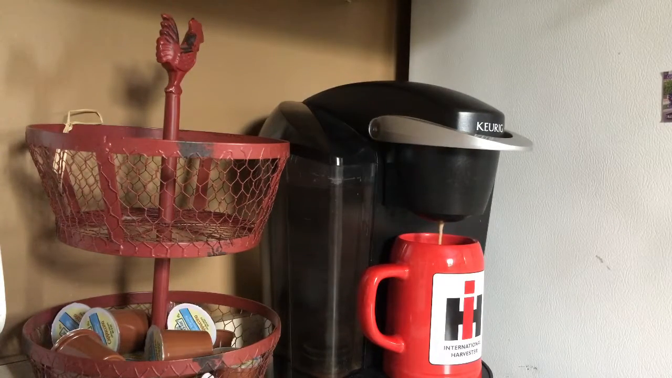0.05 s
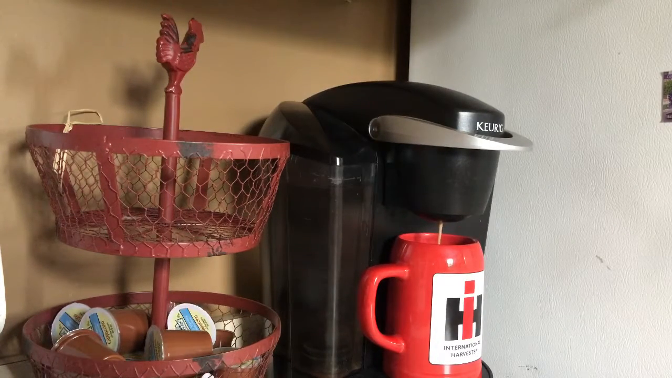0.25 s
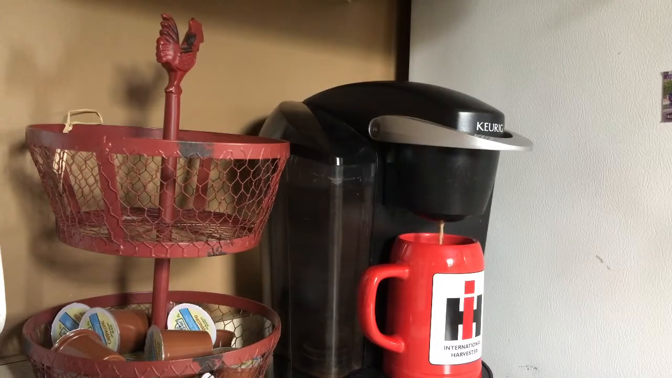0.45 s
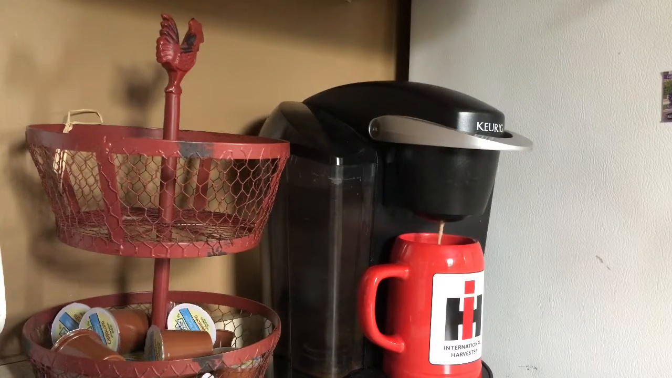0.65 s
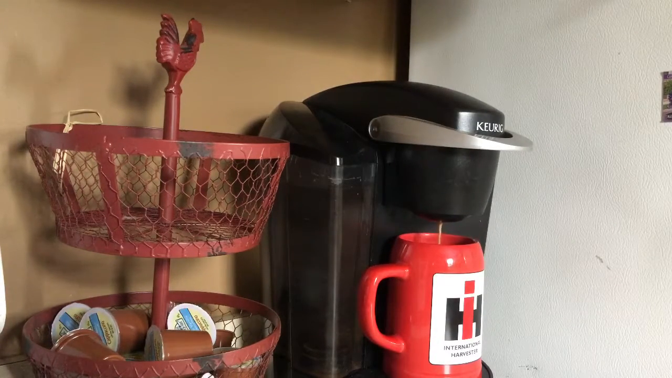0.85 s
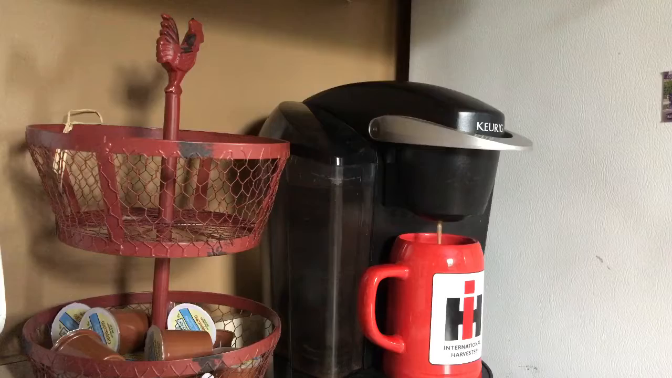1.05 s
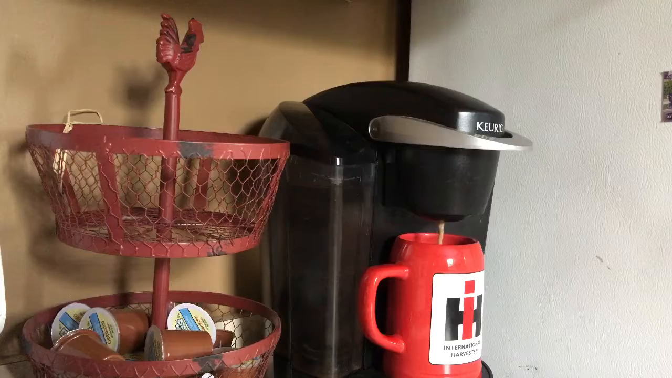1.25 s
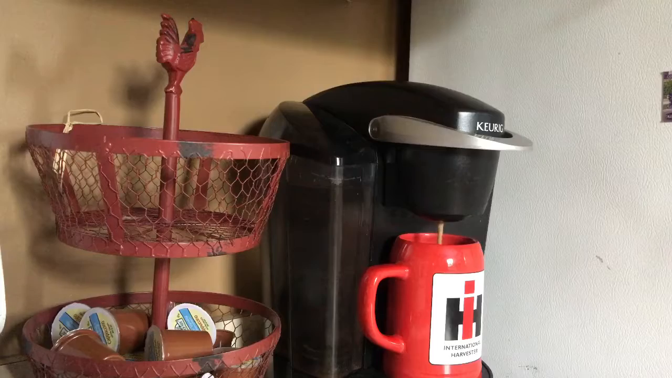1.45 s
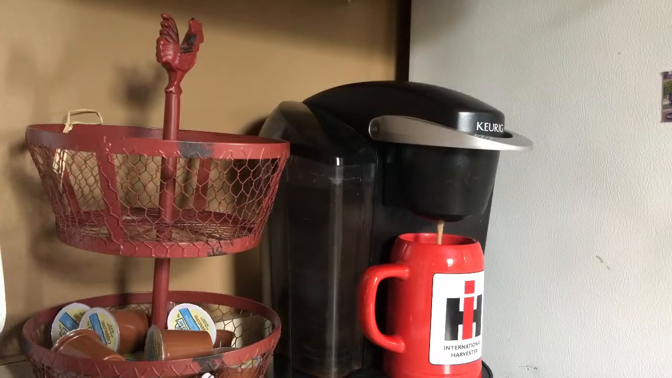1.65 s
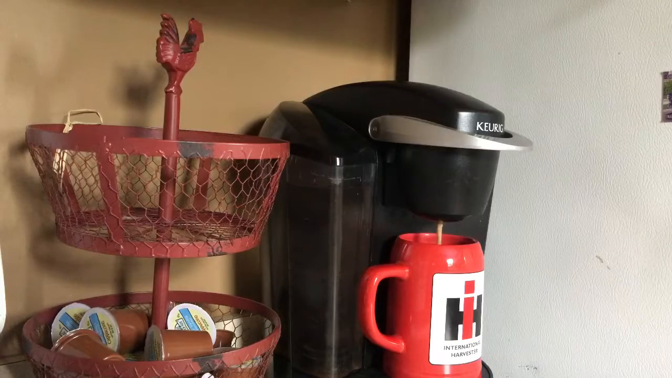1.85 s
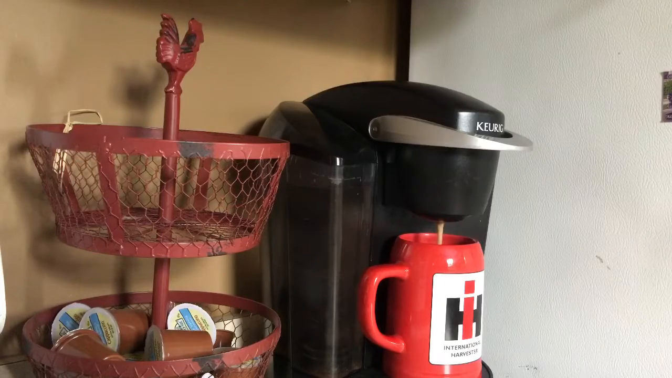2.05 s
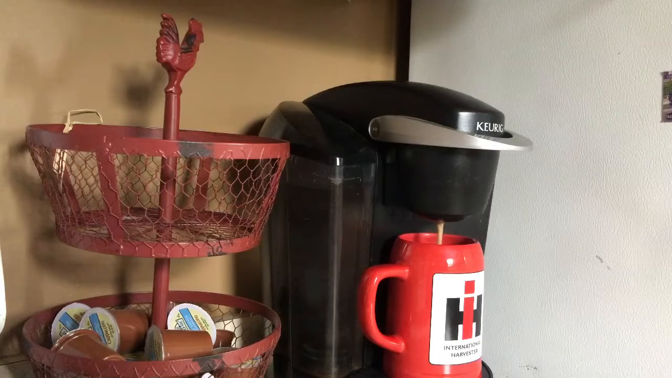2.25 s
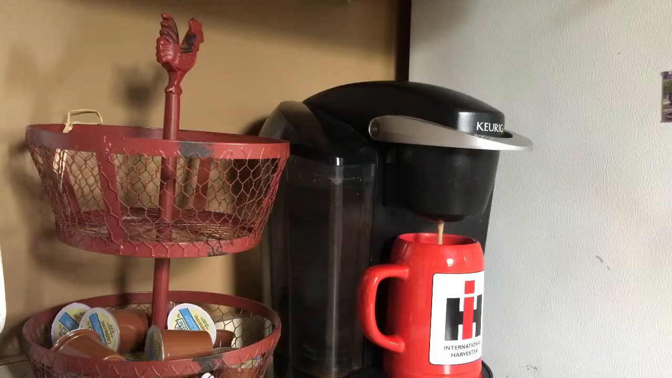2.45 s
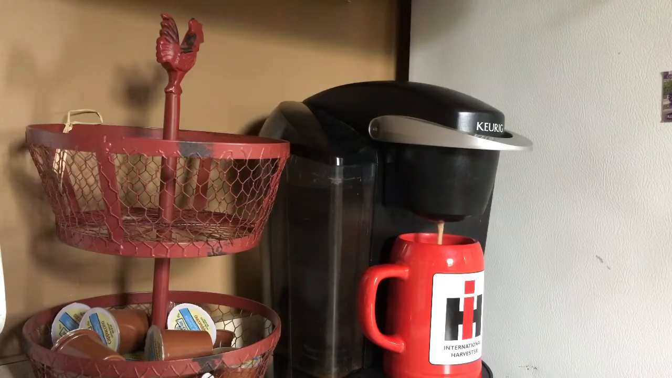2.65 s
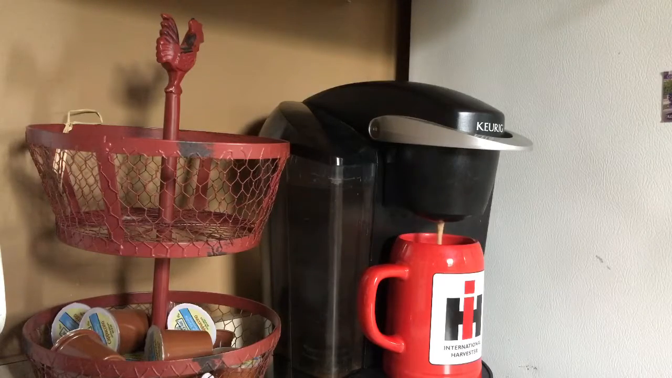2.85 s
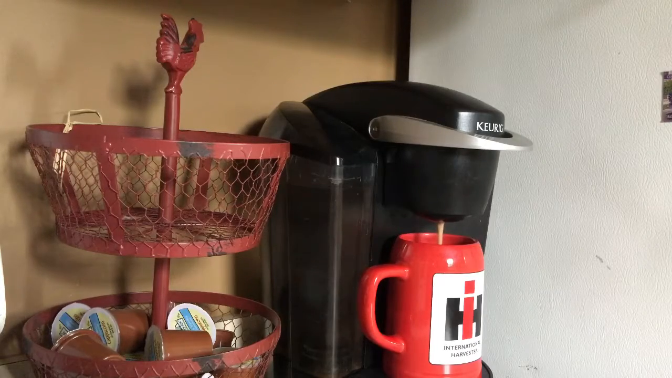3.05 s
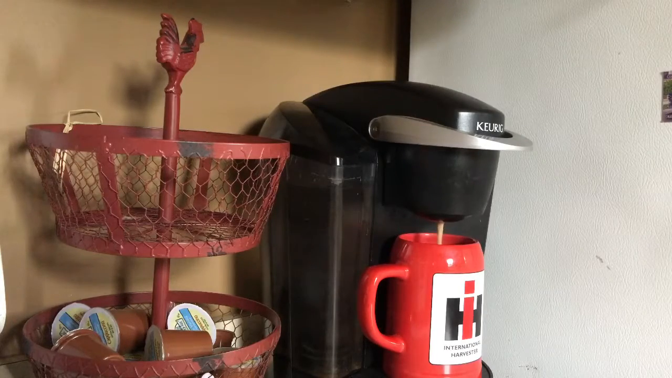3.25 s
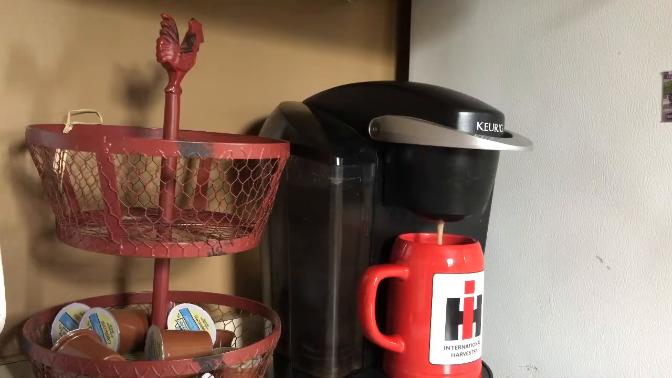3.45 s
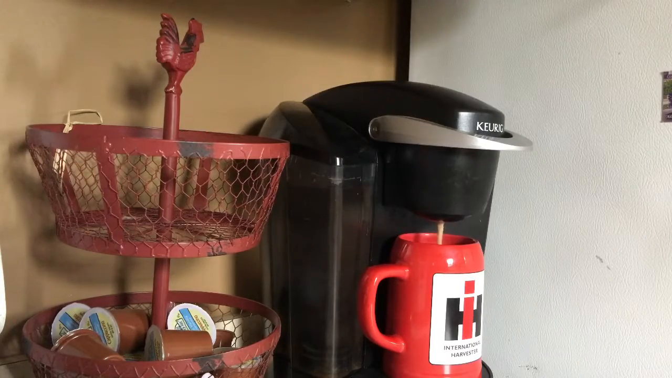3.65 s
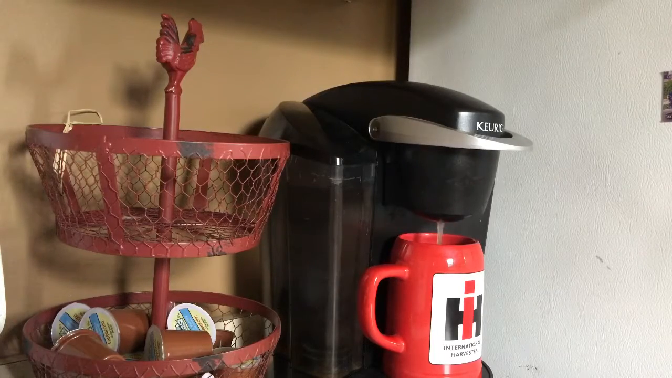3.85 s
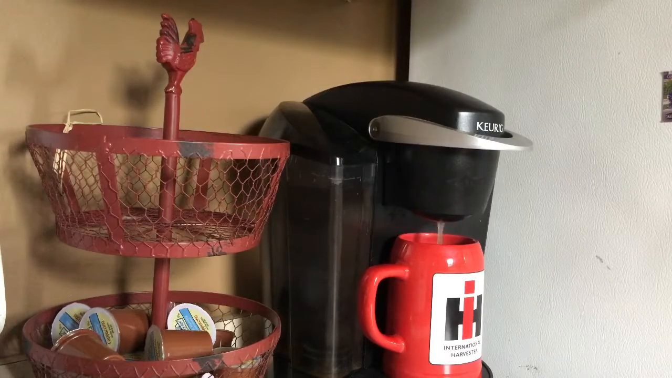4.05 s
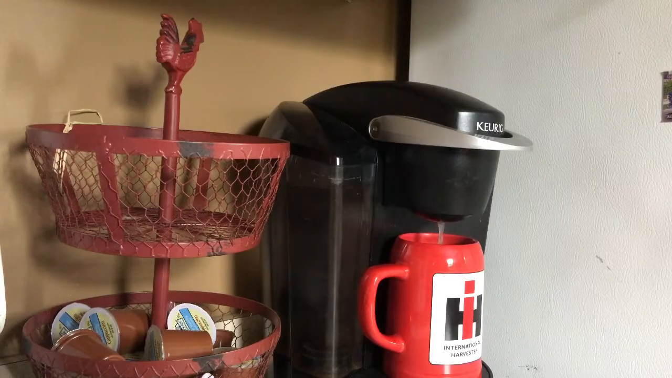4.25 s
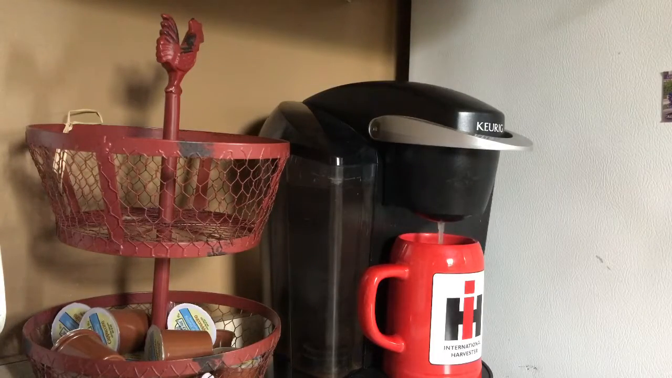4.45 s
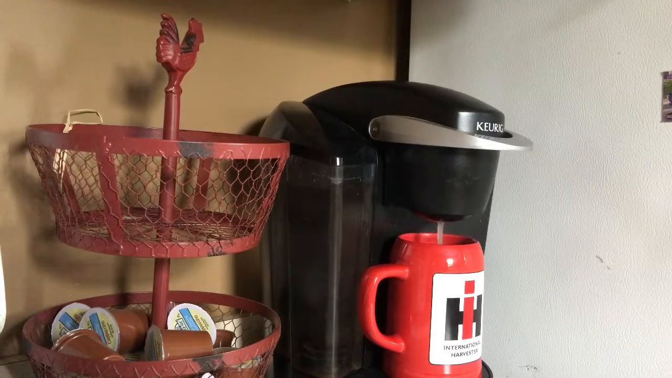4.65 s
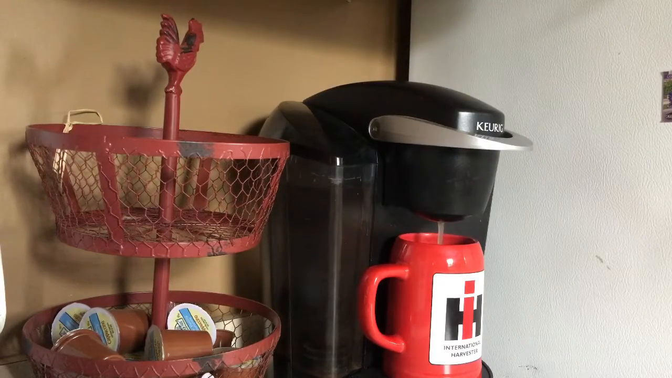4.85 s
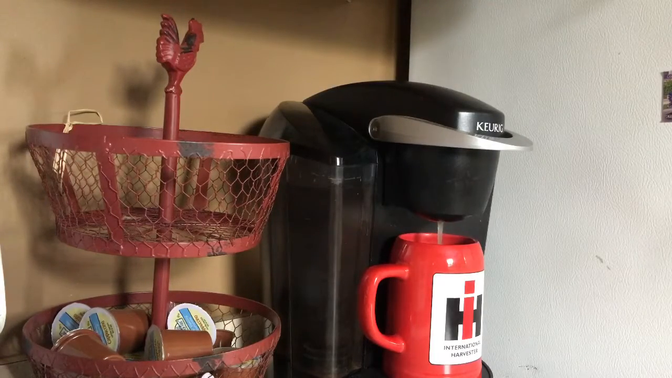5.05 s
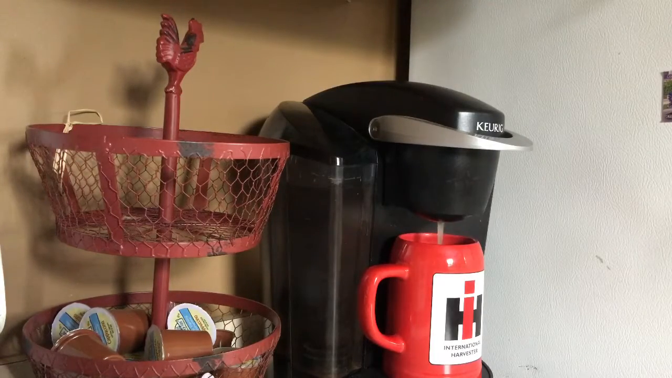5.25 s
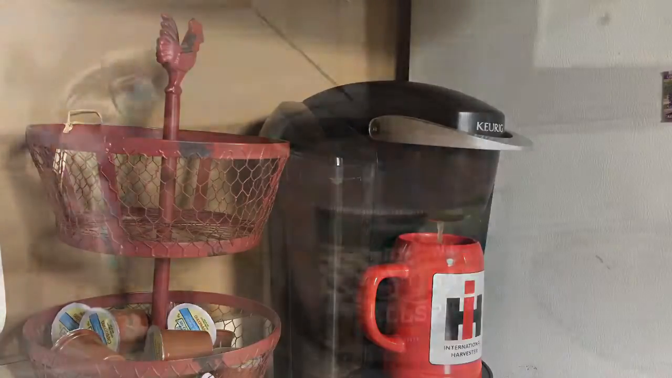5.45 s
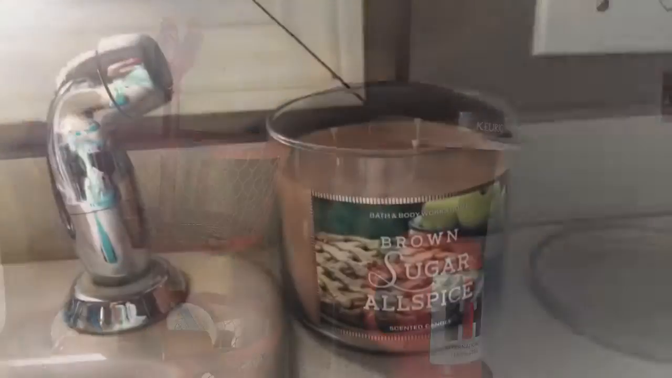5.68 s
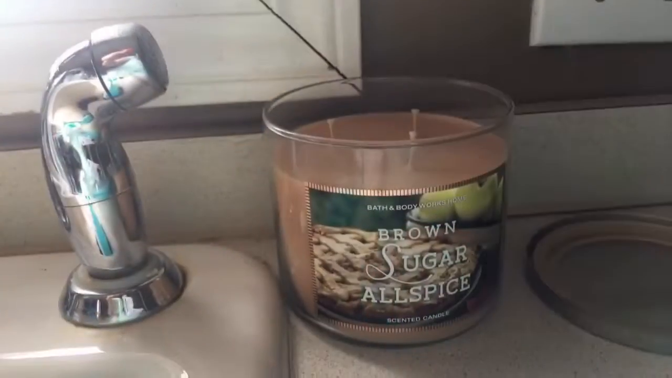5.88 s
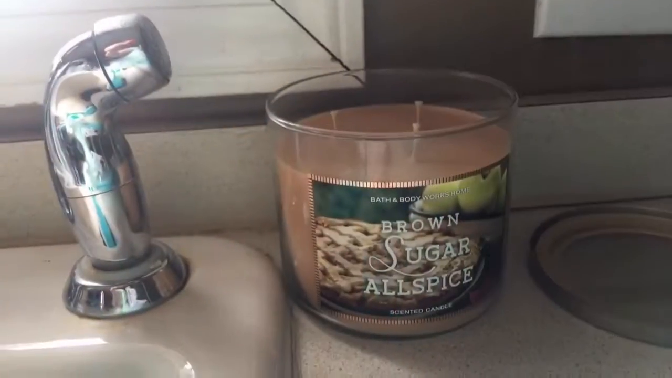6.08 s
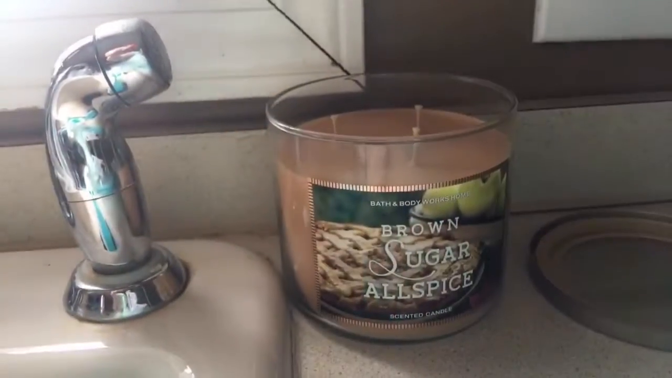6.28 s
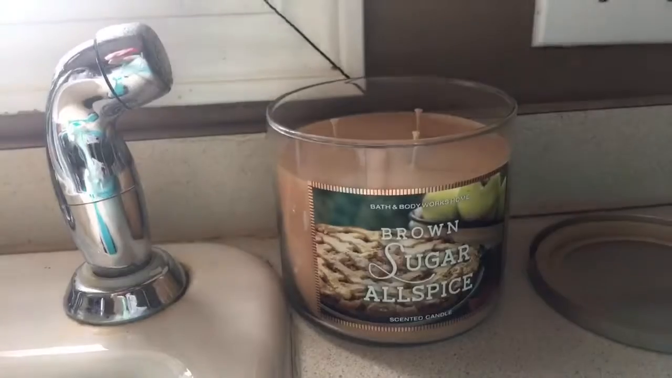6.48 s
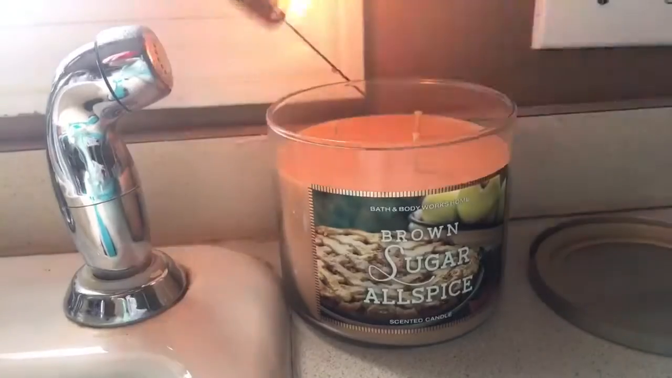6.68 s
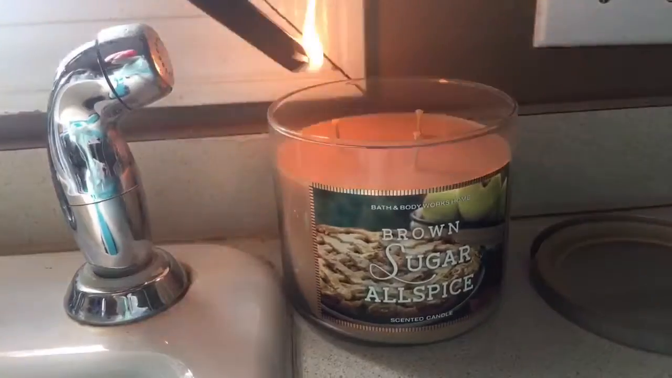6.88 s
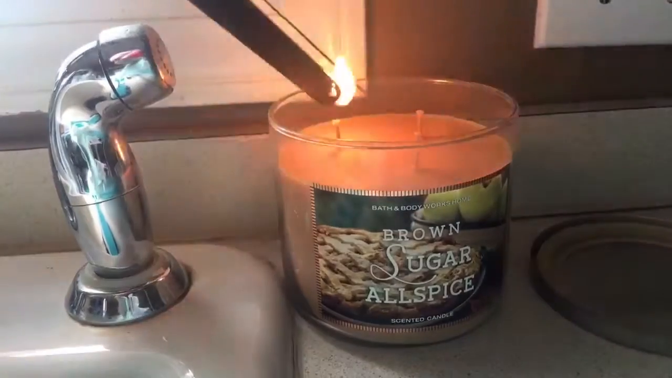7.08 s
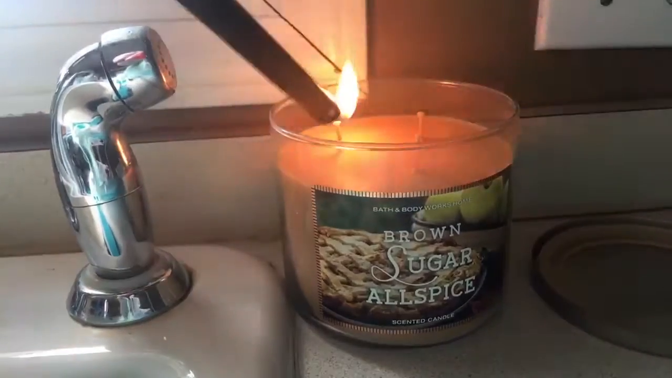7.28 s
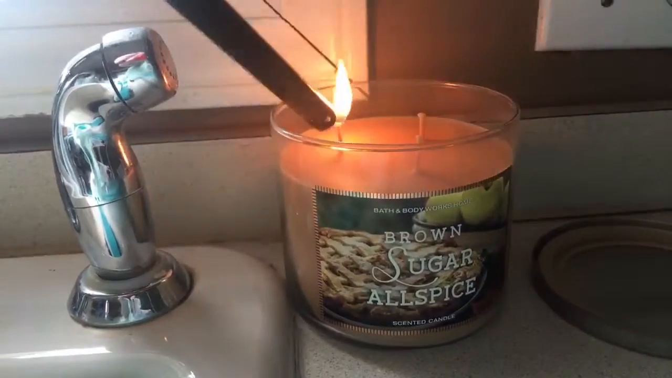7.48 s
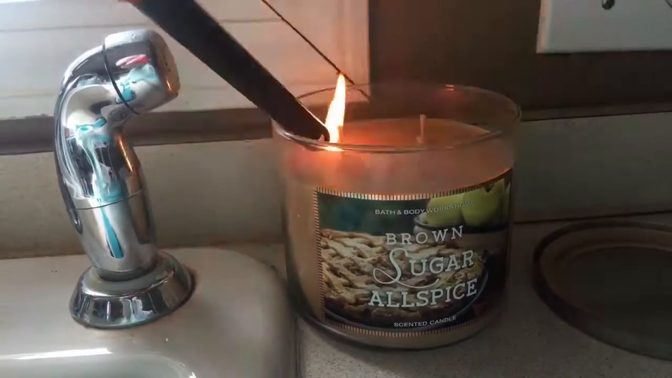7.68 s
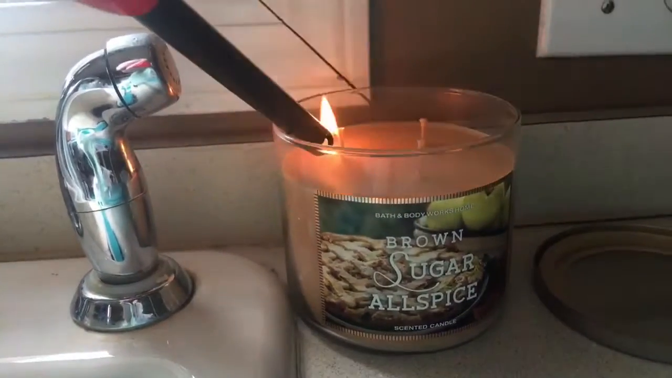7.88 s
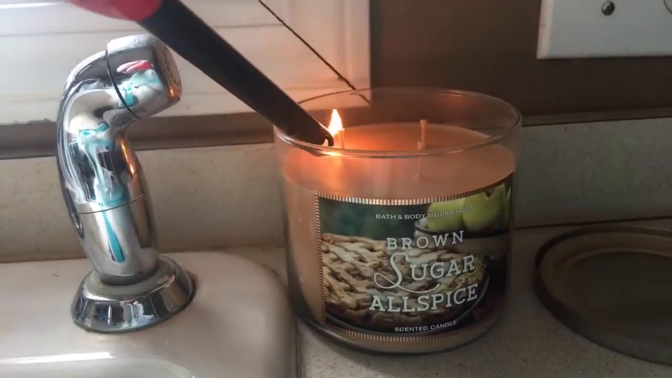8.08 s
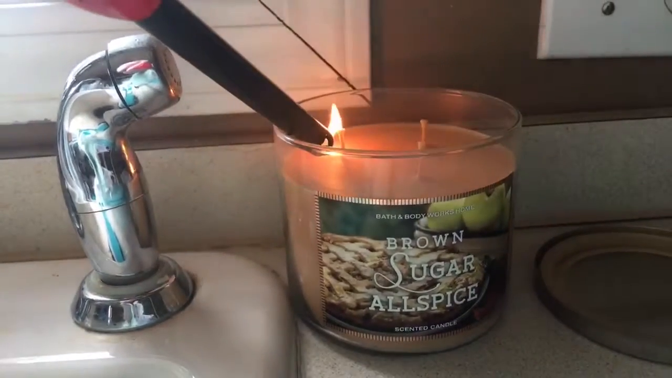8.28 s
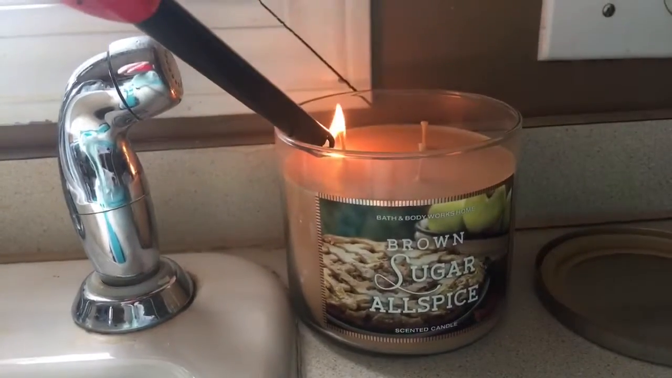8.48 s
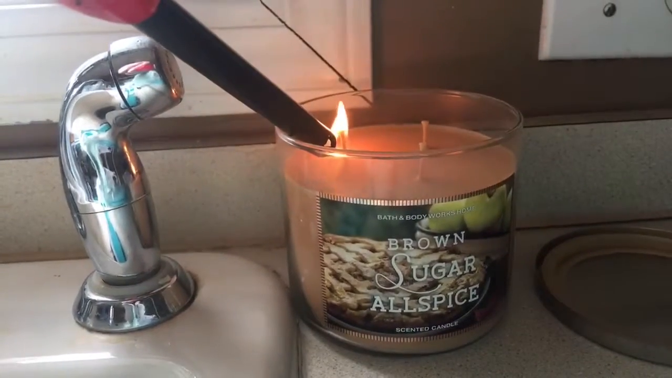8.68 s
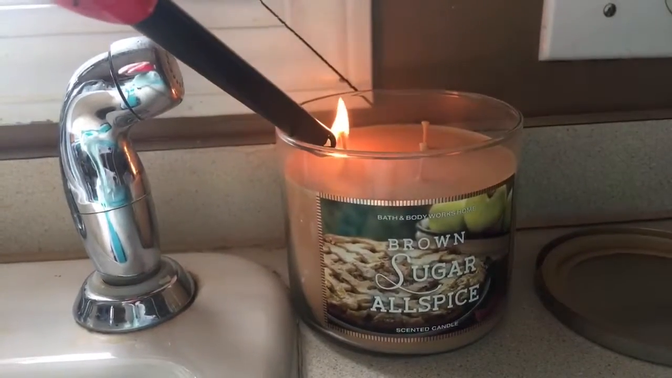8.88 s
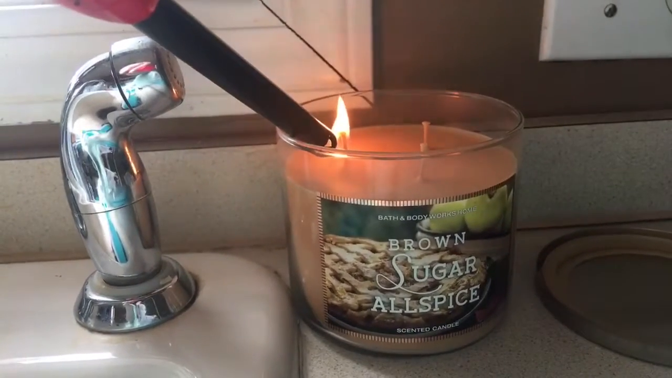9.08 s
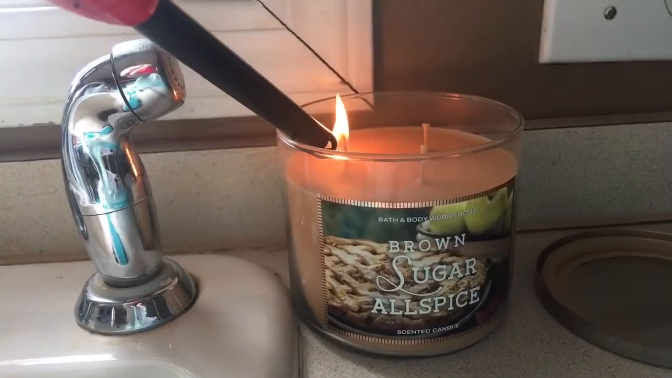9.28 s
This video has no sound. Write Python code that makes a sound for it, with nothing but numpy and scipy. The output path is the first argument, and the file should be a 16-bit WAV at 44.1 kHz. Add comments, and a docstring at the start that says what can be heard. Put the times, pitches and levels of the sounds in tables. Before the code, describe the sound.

A close mono pickup in a small hard kitchen, mostly direct with a short, quiet echo. From 0 to about 5.4 s, coffee trickles softly into a mug: quick irregular drips, hollow bubbles, fine bright spray and a low, buzzing pump hum. Dripping is densest in the first two seconds, then thins; around 3.3 s the hum rises slightly, and from 3.4 to 4.5 s rounder, foamy glugs stand out. Between 5.4 and 5.85 s this fades over to low rumble and mains hum. From 6.27 s light plastic ticks and a tiny creak build as a lighter trigger is pulled, then at 6.66 s a sharp, very loud ringing snap lands with a low puff and bump of air. Faint gas hiss lasts until 7.07 s. At 7.72 s the trigger releases with a hard metallic clack and small after-click, leaving only quiet rumbling room hum to the end.

```python
"""A small hard kitchen, in mono, mostly direct sound with the room's echo well underneath.
A pod coffee machine trickles its last coffee into a mug: random impacts excite the mug's resonances,
drops and spray spatter, bubbles ring in the mug's air column, and pump harmonics and a noise hum lie beneath.
It fades over to a counter with low rumble and mains hum, shaped from noise. There a long gas lighter creaks
with tiny slips, snaps alight with ringing clicks and a low puff, hisses with filtered noise and clicks back."""
import sys
import numpy as np
from scipy import signal
from scipy.fft import rfft, irfft
from scipy.io import wavfile

SR = 44100
rng = np.random.default_rng(int(sys.argv[2]) if len(sys.argv) > 2 else 0)


def store_pcm(level_fs):
    """Save levels as 16-bit WAV."""
    pcm = np.round(np.clip(level_fs, -1, 1) * 32767).astype(np.int16)
    wavfile.write(sys.argv[1], SR, np.atleast_2d(pcm).T)


N = 411012
T = np.arange(N) / SR   # time axis in s

# Columns named relative_db shape a spectrum only; the loudness is set where the sound is mixed.
# large bubbles in the mug: start_s, level_db, pitch_hz
GLUGS = [(0.006, -33, 867), (0.105, -44, 891), (0.214, -44, 872), (0.316, -40.5, 870), (0.337, -42.5, 866),
         (0.369, -37.5, 853), (0.616, -37, 862), (0.635, -40.5, 869), (0.751, -47, 869), (0.802, -40, 874),
         (0.82, -40, 864), (0.892, -43.5, 870), (0.998, -43.5, 875), (1.223, -45, 865), (1.243, -39, 860),
         (1.262, -33, 1010), (1.304, -39.5, 858), (1.547, -43, 869), (1.708, -41.5, 874),
         (1.748, -40.5, 864), (2.103, -44.5, 863), (2.213, -34.5, 851), (2.483, -42, 870), (2.51, -44, 860),
         (2.645, -45, 863), (2.988, -41, 900), (3.303, -38.5, 913), (3.389, -39.5, 918), (3.41, -28, 880),
         (3.522, -41, 870), (3.554, -29.5, 874), (3.782, -39.5, 883), (3.973, -40, 1010), (4.022, -38, 993),
         (4.067, -36, 1038), (4.15, -41.5, 1010), (4.189, -36.5, 894), (4.206, -32, 875), (4.233, -38, 985),
         (4.271, -36.5, 1020), (4.321, -29, 918), (4.427, -45, 1010), (4.464, -39.5, 1102),
         (4.487, -31.5, 1010), (4.656, -40.5, 1010), (4.826, -36.5, 923), (4.891, -39, 1010),
         (4.941, -39.5, 855), (5.215, -44, 861), (5.234, -43, 945), (5.384, -48, 886), (5.583, -40.5, 869)]
# drops on the coffee: start_s, level_db (before the bubble and tick offsets), pitch_hz
DROPS = [(0.014, -35.5, 2440), (0.056, -38, 1340), (0.082, -38, 1850), (0.1042, -39, 1380),
         (0.1192, -32, 1330), (0.2134, -34, 1430), (0.2656, -33.5, 3360), (0.3082, -34, 1720),
         (0.3676, -27.5, 1390), (0.391, -32, 2730), (0.4253, -36, 1430), (0.4794, -42, 1430),
         (0.5092, -34.5, 3450), (0.5576, -41, 3130), (0.5771, -39, 1470), (0.5951, -33.5, 1710),
         (0.6145, -36.5, 1250), (0.6365, -43, 1430), (0.6758, -32, 1430), (0.7208, -44, 3460),
         (0.8014, -38, 1410), (0.83, -37, 3180), (0.8929, -42, 1670), (0.905, -36, 1430),
         (0.9662, -47, 3400), (0.9937, -43, 1380), (1.0779, -38, 3980), (1.0932, -30, 2720),
         (1.1473, -34.5, 2730), (1.222, -34.5, 1310), (1.257, -38, 1440), (1.2786, -27.5, 3460),
         (1.3319, -35.5, 3530), (1.4092, -36.5, 3070), (1.4505, -41, 1430), (1.517, -32, 2300),
         (1.569, -36, 1430), (1.5996, -27.5, 2950), (1.6189, -26.5, 2950), (1.707, -28.5, 2740),
         (1.8033, -42, 2390), (1.8248, -46, 1410), (1.8392, -46, 2940), (1.939, -42, 1320),
         (1.9515, -41, 3090), (1.9883, -39.5, 3100), (2.011, -39.5, 1430), (2.0383, -45, 3110),
         (2.0862, -44, 2710), (2.1006, -38, 1330), (2.143, -41, 2750), (2.1548, -30.5, 1720),
         (2.219, -36.5, 3050), (2.3082, -39.5, 2760), (2.3585, -50, 2320), (2.373, -36.5, 2920),
         (2.4025, -41.5, 3100), (2.4818, -43, 1310), (2.5037, -34, 3170), (2.5145, -34, 3490),
         (2.6823, -47, 2760), (2.8315, -36, 4650), (2.9153, -34.5, 1430), (2.949, -36, 3500),
         (2.9866, -47, 1420), (2.9984, -40, 1290), (3.0242, -38, 1390), (3.0693, -38.5, 4000),
         (3.3278, -44, 2750), (3.3732, -41.5, 2700), (3.3942, -35, 2680), (3.478, -48, 2680),
         (3.5199, -40.5, 2740), (3.6062, -44, 3060), (3.7239, -40.5, 3400), (3.781, -31, 2440),
         (3.8302, -53, 3100), (3.949, -42, 2480), (3.9731, -35, 2880), (4.0203, -49, 1700),
         (4.0337, -46, 2450), (4.06, -38.5, 2380), (4.117, -48, 3080), (4.1492, -35.5, 3450),
         (4.1759, -42, 3380), (4.2705, -45, 2390), (4.4478, -47, 3210), (4.4852, -47, 1280),
         (4.565, -48, 3340), (4.8249, -42.5, 2750), (4.8903, -41, 2760), (4.94, -40, 3100),
         (5.1966, -47, 3640), (5.216, -42, 2710), (5.4033, -38, 2920), (5.667, -47, 2950)]
# bursts of fine spray: start_s, level_db (before the patch and fizz offsets), centre_hz
SPRAY = [(0.027, -39.5, 9500), (0.1052, -40, 5030), (0.156, -45, 10100), (0.1895, -46, 13700),
         (0.2039, -39, 11000), (0.2663, -42, 13700), (0.3306, -36, 13700), (0.3676, -43, 8940),
         (0.4249, -42, 6220), (0.4648, -42, 6770), (0.4713, -36.5, 9190), (0.5766, -44, 13700),
         (0.6604, -50, 10900), (0.6744, -37, 10000), (0.6978, -41, 6450), (0.8574, -38, 13800),
         (0.8919, -44, 11200), (0.9577, -48, 13900), (0.9916, -47, 5750), (1.0787, -43, 7800),
         (1.1887, -40, 8750), (1.2121, -32.5, 6450), (1.271, -35.5, 6070), (1.5125, -40.5, 5400),
         (1.5778, -38, 6990), (1.6202, -50, 6000), (1.6387, -28, 9500), (1.703, -45, 5040),
         (1.7345, -40, 7120), (1.8711, -41, 6040), (1.9165, -40, 10200), (2.0383, -43, 10200),
         (2.0852, -48, 10100), (2.0965, -36, 11000), (2.142, -49, 7060), (2.1555, -38, 13700),
         (2.2827, -48, 7080), (2.3501, -47, 9890), (2.373, -42, 7090), (2.6219, -48, 5540),
         (2.7147, -45, 6970), (2.8315, -37.5, 4970), (2.999, -41, 4970), (3.03, -39.5, 5590),
         (3.1188, -49, 7090), (3.1635, -40, 6910), (3.4511, -52, 10100), (3.6795, -49, 6260),
         (3.7824, -43, 10200), (3.908, -40, 9200), (3.9789, -36.5, 12600), (4.0153, -37, 12200),
         (4.0871, -46, 10900), (4.125, -48, 7110), (4.1759, -43, 10700), (4.1886, -41, 5050),
         (4.2158, -43, 9450), (4.288, -36.5, 10700), (4.8903, -43, 11100), (4.9397, -51, 9200),
         (4.997, -48, 5030), (5.3832, -48, 13700), (5.5144, -47, 9230), (5.7374, -44, 11100)]
# the stream under the single drops: start_s, gurgle_db, spatter_db, fizz_db
STREAM_LEVELS = [(0.0, -51.5, -57, -69.5), (0.41, -66, -58.5, -66.5), (0.7, -55.5, -57.5, -70.5),
                 (1.17, -62, -59, -60.5), (1.45, -57, -57, -63.5), (1.86, -60.5, -57, -65),
                 (2.46, -62, -58.5, -69.5), (3.0, -61, -58.5, -62.5), (3.26, -60, -61, -67),
                 (3.44, -63, -61, -65.5), (3.83, -58, -62, -66), (4.14, -52.5, -59, -66),
                 (4.46, -58, -62.5, -62.5), (4.72, -54.5, -61, -63), (5.12, -61.5, -61, -61),
                 (5.46, -58.5, -64, -66.5), (5.7, -67, -73, -75), (5.85, -64, -75, -79)]
# the stream turns to foam: start_s, froth_gain (loose bubbles added to the gurgle)
FOAM = [(0, 0.086), (3.1, 0.22), (3.9, 0.54), (5.8, 0.77)]
# resonances of mug and drip bay: pitch_hz, width_hz, level_db
MUG_MODES = [(1430, 45, 5), (1710, 32, 3), (2440, 920, -2), (2715, 22, 7), (2920, 110, 2.5),
             (3450, 200, 1.5), (4074, 51, -1), (6040, 93, -10), (7840, 63, -22), (9140, 73, -5),
             (10200, 270, -12)]
# resonances of the air in the mug: pitch_hz, width_hz, level_db
AIR_COLUMN = [(869.4, 26, 12), (1010, 51, 5), (1134, 100, -0.5)]
# spectrum of the fine fizz: frequency_hz, relative_db
FIZZ_SPECTRUM = [(2350, -26), (4000, -10.5), (5310, -1), (6860, -2), (7440, -12), (10300, -1), (11700, -15),
                 (14200, -5.5), (16000, -7.5)]
# spectrum of the machine's noise hum: frequency_hz, relative_db
HUM_SPECTRUM = [(8.8, -36), (15, -27.5), (160, 3.5), (225, -8), (339, -4.5), (402, -9.5), (469, -7.5),
                (639, -15), (840, -5), (900, -17.5), (1170, -26.5), (1980, -120)]
# harmonics of the pump: multiple, level_db (relative to PUMP_DB)
PUMP_HARMONICS = [(1, -36), (2, -4), (3, -4), (4, -8.5), (5, 2), (6, -1.5), (7, -14), (8, -1), (9, -16),
                  (10, 2), (11, -4.5), (12, -11.5), (13, -7), (14, 1.5), (15, -20), (16, -2.5), (17, -3),
                  (18, -31), (19, -21), (20, -20), (21, -19), (22, -5), (23, -13), (24, -6)]

# further small events at random: mean_db, spread_db, lowest_hz, highest_hz, loss over the trickle in dB
RANDOM_GLUGS = (-52, 3, 840, 1037, 0)
RANDOM_DROPS = (-48, 4, 1300, 3498, 4)
RANDOM_SPRAY = (-49, 2.5, 5000, 12000, 0.5)
GLUG_T60_S, PARTNER_SHARE = .06, 0.59   # ring time; strength of the neighbouring mode
THUD_HZ, THUD_T60_S, THUD_DB = 169.5, 0.079, -12   # a large bubble also shakes the drip tray
PUMP_HZ, PUMP_DB = 33.68, -68
HUM_DB, HUM_RISE_S, HUM_RISE_DB = -60, 3.3, 2.5   # the machine's hum grows as the brew ends
HUM_WAVER_DB = 1.5
DIP_S, DIP_WIDTH_S, DIP_DB = 3.812, .011, -22   # the level dips briefly

# parts of the trigger's clicks; the loud snap near 6.66 s takes several rows:
# start_s, level_db (reference for the row), rattle_t60_s, rattle_centre_hz,
# treble_db, barrel_ring_db, knock_db (the last three relative to level_db)
TRIGGER = [(6.265, -41, 0.018, 2480, -20, -12, -30), (6.377, -45.5, 0.064, 2976, -20, -12, -30.5),
           (6.417, -46, 0.1, 2977, -23.5, -11, -25), (6.4305, -38, 0.042, 3840, -23, -11, -30.5),
           (6.47, -37, 0.038, 3850, -25, -10, -28), (6.4903, -38, .015, 3005, -25, -14.5, -32),
           (6.4943, -26, 0.053, 2690, -15.5, -1, -30), (6.537, -25, .025, 2680, -32.5, -19.5, -30.5),
           (6.5859, -21, 0.021, 2460, -29.5, -28, -33), (6.6428, -34, 0.027, 3800, -19, -14.5, -30.5),
           (6.6586, -9, 0.015, 5360, 5.5, -24.5, -41.5), (6.6593, -9, 0.044, 2690, -15, -21.5, -40),
           (6.664, -8.5, 0.028, 3610, -9.5, -24, -42), (6.6773, -18, 0.02186, 3630, -18.5, -18, -41.5),
           (6.685, -28, 0.38, 3730, -6.5, -25, -40), (6.7241, -18.5, 0.018, 2440, -26, -23, -38),
           (7.7154, -7.5, 0.019, 3000, -13.5, 4, -18), (7.717, -16, 0.033, 1980, -26, -16, -29.5),
           (7.7637, -27, 0.029, 2000, -29, -15, -11)]
# ringing modes of the barrel: pitch_hz, level_db, t60_s
BARREL_MODES = [(1771, -18, 0.055), (2274, -9, 0.029), (2770, -16, 0.063), (3150, -21.5, 0.0492),
                (4064, -8, .02), (4240, -2.5, 0.036), (4210, -17.5, 0.054), (5860, -17.5, .03),
                (7250, -21.5, 0.025), (8570, -20.5, .018), (9824, -29.5, .04), (11000, -16, 0.018)]
# rattle spectrum of the plastic shell: frequency_hz, relative_db
SHELL_SPECTRUM = [(120, -53), (200, -7.5), (590, -12.5), (1060, -30), (1330, -6), (1840, -7.5),
                  (2740, -0.5), (3540, -2.5), (4920, -29), (6000, -22), (7800, -40), (13200, -120)]
# treble spectrum of the clicks: frequency_hz, relative_db
CRACK_SPECTRUM = [(3500, -21.5), (5300, -2), (6500, -7), (9000, -2), (12000, -8.5), (15000, -11),
                  (15800, -35.5)]
# knock spectrum of the grip in the hand: frequency_hz, relative_db
KNOCK_SPECTRUM = [(150, -24), (330, -0.5), (480, -17), (800, -6.5), (1200, 4.5), (1600, -9), (3000, -38)]
# spectrum of the hissing gas: frequency_hz, relative_db
GAS_SPECTRUM = [(1500, -21), (3000, -5), (5000, 3), (9000, 0), (15000, -8), (16500, -21.5)]

KNOCK_T60_S, RATTLE_WIDTH_HZ, BLOW_T60_S = 0.045, 1500, .03
CREAK_FROM_S, CREAK_TO_S, CREAK_DB, CREAK_PER_S = 6.375, 6.6, -57, 500   # the trigger drags in its guide
PUFF_S, PUFF_DB, PUFF_HZ, PUFF_T60_S = 6.675, -25, 278, 0.12   # the gas catches fire
PUSH_S, PUSH_DB, PUSH_HZ, PUSH_T60_S = 6.675, -17.5, 43, 0.24   # and its air pushes on the microphone
GAS_LEAK_S, GAS_LEAK_DB = 6.39, -73   # the hiss starts,
GAS_OPEN_S, GAS_OPEN_DB, GAS_END_S = 6.68, -64, 7.07   # swells and stops

# spectrum of the room tone: frequency_hz, relative_db
ROOM_SPECTRUM = [(53, -40.5), (90, -8), (124, -5.5), (187, -20.5), (232, -11.5), (269, -38.5), (313, -14.5),
                 (432, -32.5), (623, -23), (772, -40), (878, -29.5), (2800, -28), (3790, -29), (5110, -40),
                 (15300, -50.5)]
# spectrum of the low rumble: frequency_hz, relative_db
RUMBLE_SPECTRUM = [(8.8, -35), (15, -6.5), (43, 0), (59, 2.5), (92, -22.5), (110, -8.5), (140, -34.5),
                   (240, -120)]
# echo time of the kitchen: frequency_hz, t60_s
KITCHEN_DECAY = [(100, 0.2), (1000, 0.3), (3000, 0.37), (8000, 0.13), (15000, 0.21)]

TONE_DB, RUMBLE_DB, RUMBLE_LUMPS_DB = -54.5, -47.5, 1.0
MAINS_HZ, MAINS_WIDTH_HZ, MAINS_DB = 120.6, 12, 1.5   # level above the room tone
LIGHTER_WET_DB, MUG_WET_DB = -13, -11.5   # echo against direct sound
FADE_FROM_S, FADE_TO_S = 5.4, 5.85   # the machine fades over to the counter
CUTOFF_HZ = 16550


def coffee():
    """Everything at the machine: water with its kitchen echo and direct hum, gone after the fade."""
    water, hum = stream()
    water = water + glugs() + drops() + spray()
    echo = from_db(MUG_WET_DB) * kitchen(water)
    dip = from_db(DIP_DB * np.exp(-((T - DIP_S) / DIP_WIDTH_S) ** 2))
    return (water + echo + hum) * dip * np.interp(T, [5.75, 5.85], [1, 0])


def glugs():
    """Each large bubble rings at its pitch and beats with the neighbouring mode of the mug's air."""
    out = np.zeros(N)
    for s, level_db, hz in [*GLUGS, *scattered(RANDOM_GLUGS, count=16)]:
        t, envelope = dying(GLUG_T60_S, 0.0011)
        # the partner mirrors the pitch about 940 Hz, unless the two would lie too close
        partner_hz = 1880 - hz if abs(hz - 940) > 30 else hz + 125
        ring = np.sin(2 * np.pi * hz * t)
        ring = ring - PARTNER_SHARE * np.sin(2 * np.pi * partner_hz * t)
        add(out, s, from_db(level_db) * envelope * ring)
        t, envelope = dying(THUD_T60_S, 0.0032)
        add(out, s, from_db(level_db + THUD_DB) * envelope * np.sin(2 * np.pi * THUD_HZ * t))
    return out


def drops():
    """Each drop: a small bubble rising in pitch and a tick of noise through the mug."""
    bubbles, ticks = np.zeros((2, N))
    for s, level_db, hz in [*DROPS, *scattered(RANDOM_DROPS, count=50)]:
        t, envelope = dying(0.032 + 6.4 / hz, 0.000078)      # small bubbles die sooner
        rise = 1 + rng.uniform(0, 6.2) * t
        add(bubbles, s, from_db(level_db - 6.5) * envelope * np.sin(2 * np.pi * hz * t * rise))
        add(ticks, s, from_db(level_db + 4.0) * dying(0.018, 0.000078)[1])
    return bubbles + resonate(ticks * rng.standard_normal(N), MUG_MODES)


def spray():
    """Each burst: broad fizz with a brighter patch of noise around its centre."""
    patches, bursts = np.zeros((2, N))
    for s, level_db, hz in [*SPRAY, *scattered(RANDOM_SPRAY, count=55)]:
        t, envelope = dying(0.028, 0.00037)
        patch = rms_one(resonate(rng.standard_normal(len(t)), [(hz, 900, 0)]))
        add(patches, s, from_db(level_db - 7.5) * envelope * patch)
        add(bursts, s, from_db(level_db - 14.5) * dying(0.026, 0.00027)[1])
    return patches + bursts * rms_one(colour(rng.standard_normal(N), FIZZ_SPECTRUM))


def stream():
    """The steady trickle, dense small impacts in the mug and its air, and the machine's hum apart."""
    gurgle_db, spatter_db, fizz_db = in_time(STREAM_LEVELS)
    gurgle = rms_one(resonate(grains(500, spread_db=5.0), AIR_COLUMN))
    foam_gain = np.interp(T, *np.transpose(FOAM))
    gurgle = gurgle + foam_gain * froth(250, 786, 1150, cycles=16.0)
    impacts = rms_one(resonate(grains(1500, spread_db=3.5), MUG_MODES))
    spatter = rms_one(impacts + 2.04 * froth(700, 1227, 3926, cycles=22.0))
    fine = rms_one(colour(grains(9000, spread_db=4.5), FIZZ_SPECTRUM))
    fizz = rms_one(fine + 0.9 * froth(500, 4750, 13800, cycles=44.0))
    water = from_db(gurgle_db) * gurgle + from_db(spatter_db) * spatter + from_db(fizz_db) * fizz
    hum_db = HUM_DB + np.interp(T, [HUM_RISE_S - .2, HUM_RISE_S + 0.18], [0, HUM_RISE_DB])
    hum_gain = from_db(hum_db + HUM_WAVER_DB * drift(2.8))
    hum = hum_gain * rms_one(colour(rng.standard_normal(N), HUM_SPECTRUM))
    return water, (hum + pump()) * (1 - fade_over())


def froth(per_s, low_hz, high_hz, cycles):
    """Small bubbles burst at random, each ringing a few cycles at one of twelve pitches."""
    clicks = grains(per_s, spread_db=3.0)
    dealt = rng.integers(0, 12, N)      # which pitch each click gets
    pitches = np.geomspace(low_hz, high_hz, 12)
    rings = [resonate(clicks * (dealt == k), [(hz, hz / cycles, 0)]) for k, hz in enumerate(pitches)]
    return rms_one(sum(rings))


def pump():
    """Harmonics of the slowly wavering pump rate, each with a random starting phase."""
    rate_hz = PUMP_HZ * (1 + 0.002075 * drift(0.5))
    phase = 2 * np.pi * np.cumsum(rate_hz) / SR
    starts = rng.uniform(0, 2 * np.pi, len(PUMP_HARMONICS))
    out = 0
    for (multiple, level_db), start in zip(PUMP_HARMONICS, starts):
        out = out + from_db(PUMP_DB + level_db) * np.sin(multiple * phase + start)
    return out


def lighter():
    """Each part of a click rattles the plastic shell, cracks in the treble, strikes barrel and grip."""
    rattle, crack, ring, knock = np.zeros((4, N))
    for s, level_db, t60, hz, treble_db, ring_db, knock_db in TRIGGER:
        t, envelope = dying(t60, .0003)
        peak = [(hz, RATTLE_WIDTH_HZ, 0)]
        tone = rms_one(resonate(resonate(rng.standard_normal(len(t)), peak), peak))
        # the first blow is one clean ring
        tone = tone + 2.94 * from_db(-60 * t / BLOW_T60_S) * np.sin(2 * np.pi * hz * t)
        add(rattle, s, from_db(level_db - 10.5) * envelope)
        add(ring, s, from_db(level_db - 7) * envelope * tone)
        add(crack, s, from_db(level_db + treble_db) * dying(0.69 * t60, 0.00071)[1])
        add(knock, s, from_db(level_db + knock_db) * dying(KNOCK_T60_S, .001)[1])
        for mode_hz, mode_db, mode_t60 in BARREL_MODES:
            t, envelope = dying(mode_t60, 0.0018)
            mode = envelope * np.sin(2 * np.pi * mode_hz * t)
            add(ring, s, from_db(level_db + ring_db + mode_db) * mode)
    shell = rms_one(colour(rng.standard_normal(N), SHELL_SPECTRUM))
    treble = rms_one(colour(rng.standard_normal(N), CRACK_SPECTRUM))
    grip = rms_one(colour(rng.standard_normal(N), KNOCK_SPECTRUM))
    return rattle * shell + crack * treble + ring + knock * grip


def creak():
    """Dense tiny slips through the plastic shell while the trigger is pulled."""
    slips = rms_one(colour(grains(CREAK_PER_S, spread_db=3.5), SHELL_SPECTRUM))
    times = [CREAK_FROM_S, CREAK_FROM_S + .03, CREAK_TO_S, CREAK_TO_S + .01]
    return from_db(CREAK_DB) * slips * np.interp(T, times, [0, 1, 1, 0])


def puff():
    """A dull burst of low noise and a slow swing of air at the microphone as the flame catches."""
    burst, swing = np.zeros((2, N))
    add(burst, PUFF_S, from_db(PUFF_DB) * dying(PUFF_T60_S, 0.015)[1])
    t, envelope = dying(PUSH_T60_S, 0.022)
    add(swing, PUSH_S, from_db(PUSH_DB) * envelope * np.sin(2 * np.pi * PUSH_HZ * t))
    band = signal.butter(1, [80, PUFF_HZ], "band", fs=SR, output="sos")
    low = signal.sosfilt(band, rng.standard_normal(N))
    return burst * rms_one(low) + swing


def gas():
    """Escaping gas: shaped noise that starts as a faint leak, swells and stops."""
    level_db = np.interp(T, [GAS_LEAK_S, GAS_OPEN_S], [GAS_LEAK_DB, GAS_OPEN_DB])
    flowing = (T > GAS_LEAK_S) * (T < GAS_END_S)
    return from_db(level_db) * flowing * rms_one(colour(rng.standard_normal(N), GAS_SPECTRUM))


def counter():
    """Behind the lighter: room tone, lumpy rumble and a mains hum that wavers as narrow noise."""
    white = rng.standard_normal((3, N))
    mains = rms_one(resonate(white[1], [(MAINS_HZ, MAINS_WIDTH_HZ, 0)]))
    tone = rms_one(colour(white[0], ROOM_SPECTRUM)) + from_db(MAINS_DB) * mains
    rumble_gain = from_db(RUMBLE_DB + RUMBLE_LUMPS_DB * drift(4.6))
    rumble = rumble_gain * rms_one(colour(white[2], RUMBLE_SPECTRUM))
    return fade_over() * (from_db(TONE_DB) * tone + rumble)


def kitchen(x):
    """Diffuse echo: octave bands of noise, each dying at its own rate; energy 1."""
    t, tail = np.arange(int(.5 * SR)) / SR, 0
    for low in 60 * 2. ** np.arange(8):
        octave = signal.butter(2, [low, 2 * low], "band", fs=SR, output="sos")
        band = signal.sosfilt(octave, rng.standard_normal(len(t)))
        tail = tail + band * from_db(-60 * t / at_hz(KITCHEN_DECAY, 2.4 * low))
    tail *= 1 - np.exp(-t / 0.002)      # the first walls answer after a few ms
    return signal.fftconvolve(x, tail / np.sqrt(np.sum(tail ** 2)))[:N]


def fade_over():
    """Share of the counter scene, 0 to 1."""
    return np.interp(T, [FADE_FROM_S, FADE_TO_S], [0, 1])


def scattered(kind, count):
    """Rows of start_s, level_db, pitch_hz for small events scattered over the trickle."""
    mean_db, spread_db, low_hz, high_hz, loss_db = kind
    when, size, pitch = rng.random((count, 3)).T
    level_db = mean_db - loss_db * when + spread_db * 2 * (2 * size - 1)
    return list(zip(when * FADE_TO_S, level_db, low_hz * (high_hz / low_hz) ** pitch))


def grains(per_s, spread_db):
    """Random clicks with a long-tailed spread of sizes, in clumps."""
    sizes = from_db(spread_db * np.minimum(rng.exponential(1, N), 5)) * rng.choice([-1, 1], N)
    chance = per_s * from_db(4 * drift(8)) / SR
    return sizes * (rng.random(N) < chance)


def drift(rate):
    """Slow chance with spread about 1, low-passed near the rate in Hz from 60 knots a second."""
    knots = rng.standard_normal(int(N / SR * 60) + 2)
    r = np.exp(-2 * np.pi * min(rate, 25) / 60)
    smooth = rms_one(signal.lfilter([1], [1, -r], knots))
    return np.interp(T * 60, np.arange(len(knots)), smooth)


def dying(t60, rise_s):
    """Time axis and an envelope with a soft rise and exponential decay, ended after t60 seconds."""
    t60 = max(t60, .002)
    t = np.arange(int(t60 * SR)) / SR
    return t, (1 - np.exp(-t / rise_s)) * from_db(-60 * t / t60)


def resonate(x, peaks):
    """Parallel resonances of pitch_hz, width_hz, level_db, signs alternating."""
    out = 0
    for k, (hz, width, level_db) in enumerate(peaks):
        r = np.exp(-np.pi * width / SR)
        b = [(1 - r * r) / 2, 0, (r * r - 1) / 2]
        a = [1, -2 * r * np.cos(2 * np.pi * hz / SR), r * r]
        out = out + (-1) ** k * from_db(level_db) * signal.lfilter(b, a, x + 1e-18)
    return out


def colour(x, spectrum):
    """Filter by a spectrum in dB, minimum phase so that nothing sounds early."""
    size = 8192
    hz = np.arange(size // 2 + 1) * SR / size + 1
    cepstrum = irfft(np.log(from_db(at_hz(spectrum, hz))))
    # fold the cepstrum onto positive time: minimum phase
    cepstrum[1:size // 2] *= 2
    cepstrum[size // 2 + 1:] = 0
    return signal.fftconvolve(x, irfft(np.exp(rfft(cepstrum))))[:len(x)]


def at_hz(points, hz):
    """A table read on a log-frequency axis."""
    table_hz, values = np.transpose(points)
    return np.interp(np.log(hz), np.log(table_hz), values)


def in_time(rows):
    """Columns of a curve table at every sample: -140 before its first row, held after its last."""
    s, *columns = np.transpose(rows)
    return [np.interp(T, s, c, left=-140, right=c[-1]) for c in columns]


def add(out, s, sound):
    """Mix a short sound in at time s."""
    i = round(s * SR)
    out[i:i + len(sound)] += sound[:N - i]


def rms_one(x):
    """Scale to rms 1."""
    return x / np.sqrt(np.mean(x ** 2) + 1e-20)


def from_db(db):
    """Decibels to gain."""
    return 10 ** (np.asarray(db) / 20)


def scene():
    """Coffee first, then the lighter at the counter, its clicks and creak echoing in the kitchen."""
    clicks = lighter() + creak()
    echo = from_db(LIGHTER_WET_DB) * kitchen(clicks)
    return (coffee() + clicks + echo + puff() + gas() + counter())[None]


def record(dry):
    """Peaks are clipped at full scale, then a steep low-pass cuts the top."""
    low_pass = signal.cheby2(20, 100, CUTOFF_HZ, fs=SR, output="sos")
    return signal.sosfilt(low_pass, np.clip(dry, -1, 1))


dry = scene()
out = record(dry)
store_pcm(out)
```